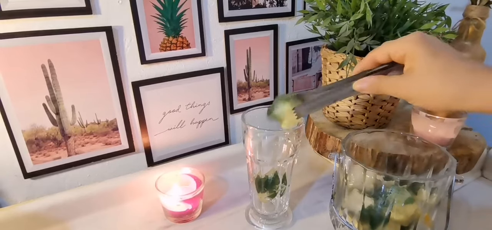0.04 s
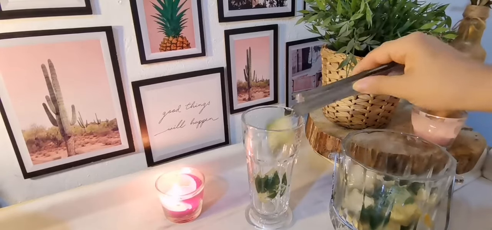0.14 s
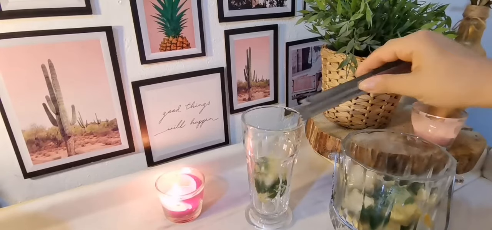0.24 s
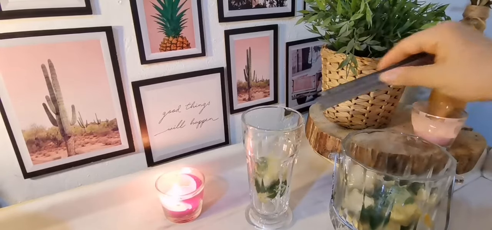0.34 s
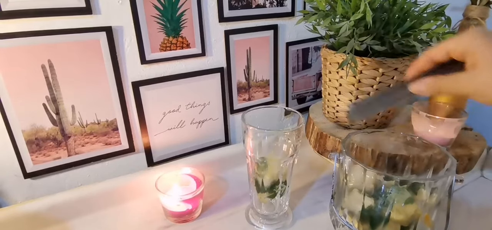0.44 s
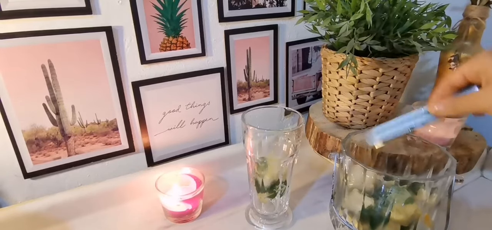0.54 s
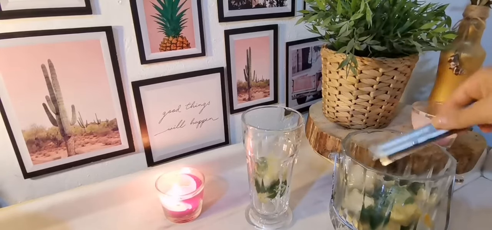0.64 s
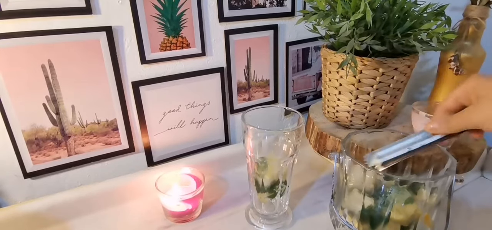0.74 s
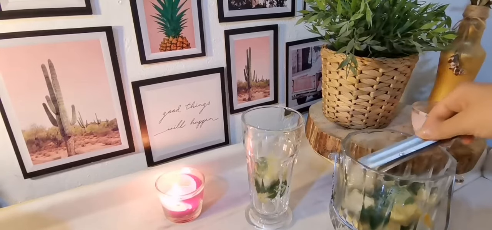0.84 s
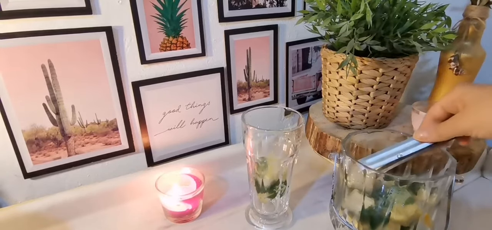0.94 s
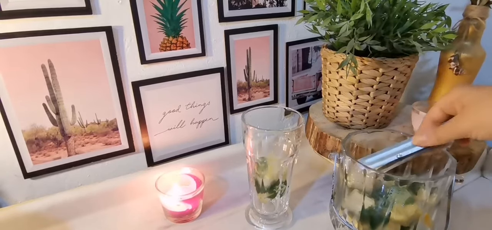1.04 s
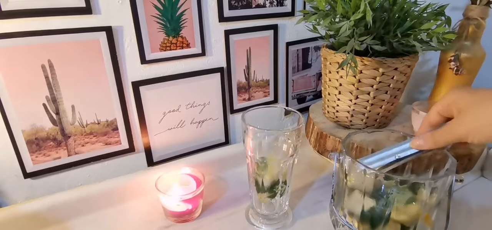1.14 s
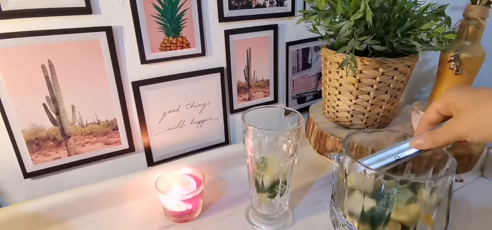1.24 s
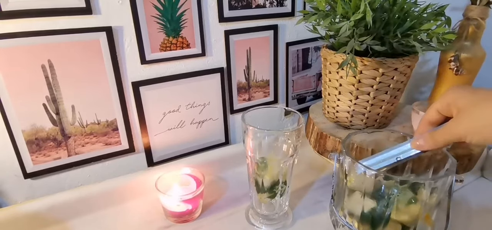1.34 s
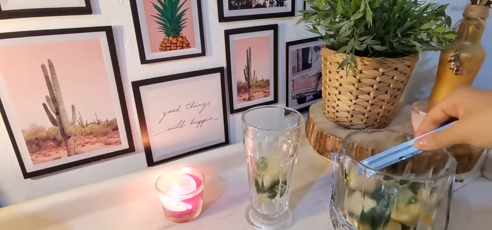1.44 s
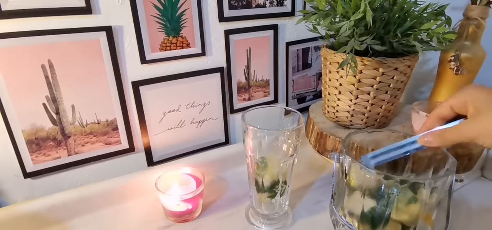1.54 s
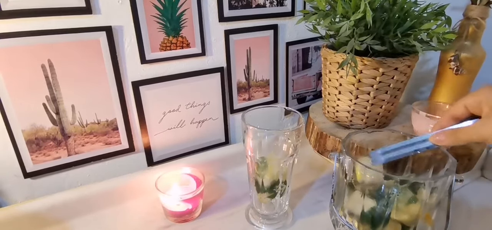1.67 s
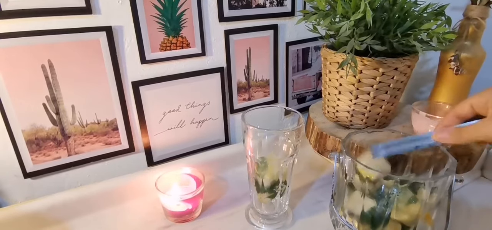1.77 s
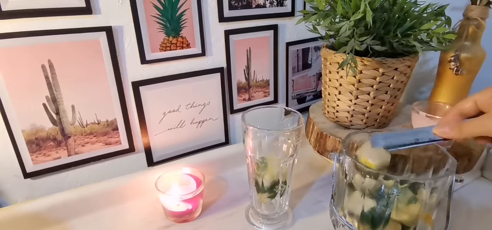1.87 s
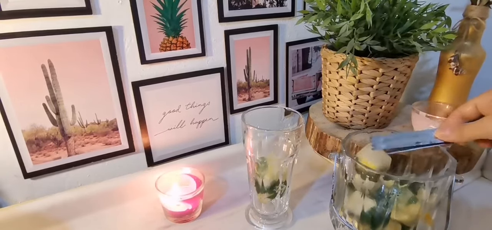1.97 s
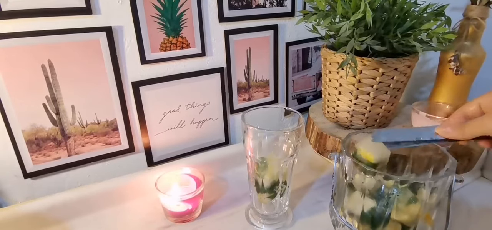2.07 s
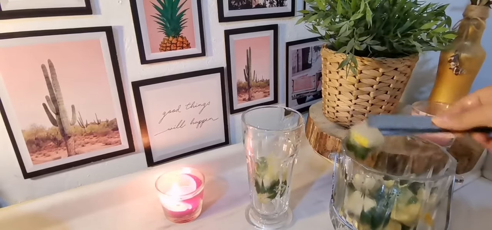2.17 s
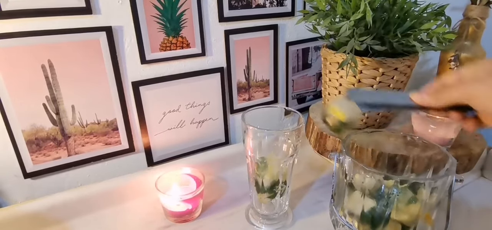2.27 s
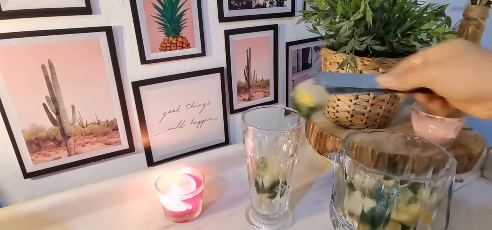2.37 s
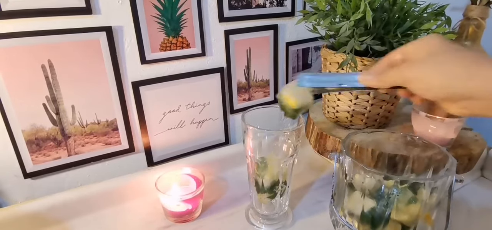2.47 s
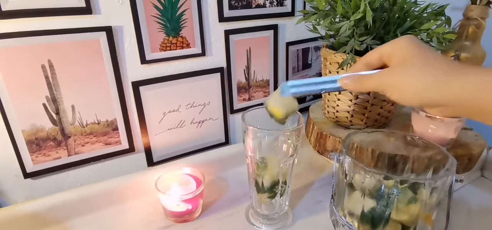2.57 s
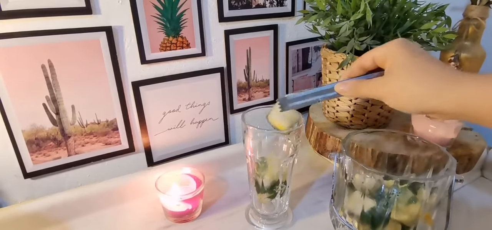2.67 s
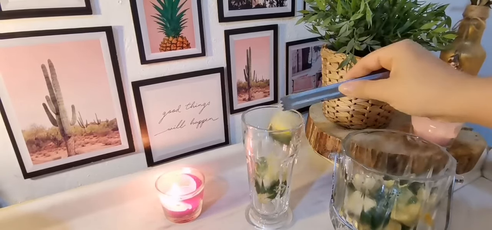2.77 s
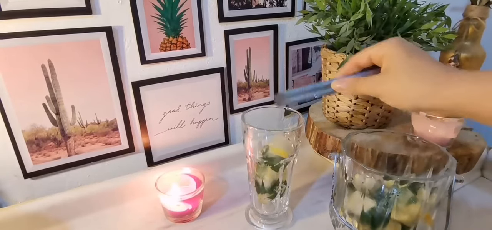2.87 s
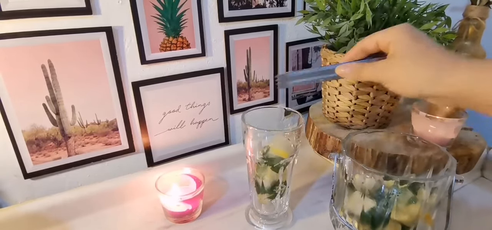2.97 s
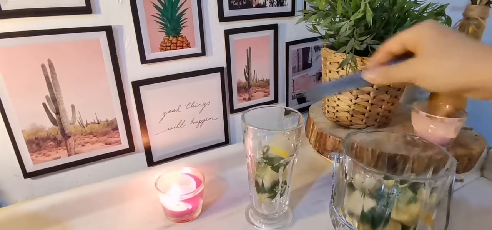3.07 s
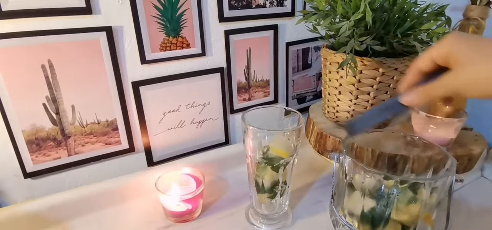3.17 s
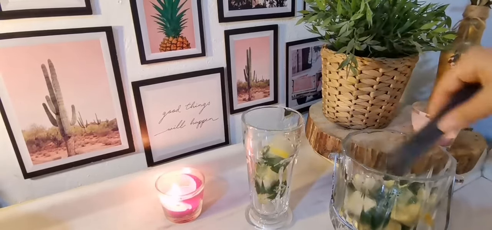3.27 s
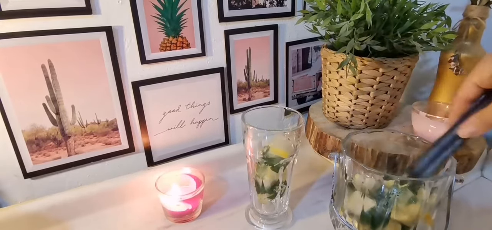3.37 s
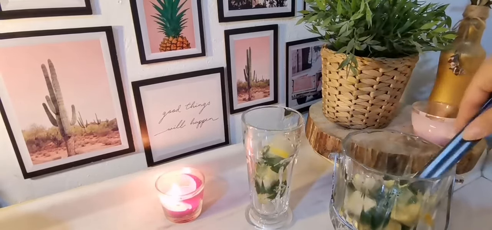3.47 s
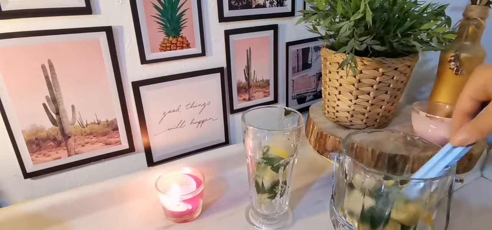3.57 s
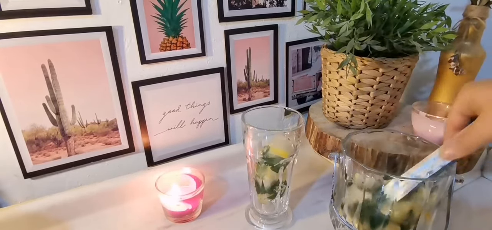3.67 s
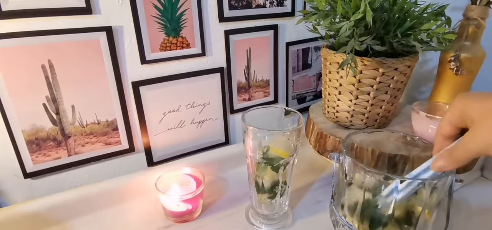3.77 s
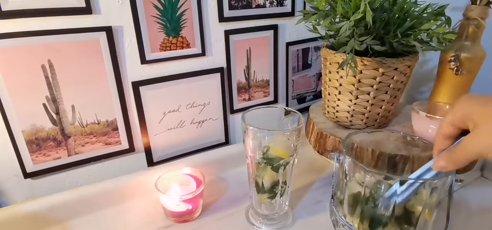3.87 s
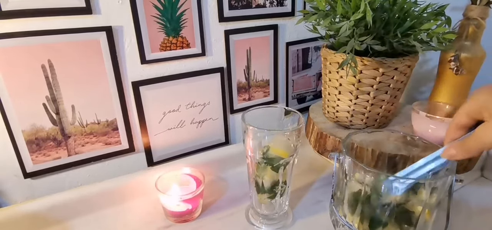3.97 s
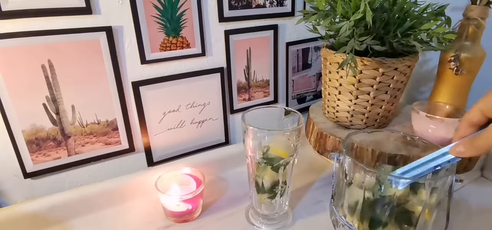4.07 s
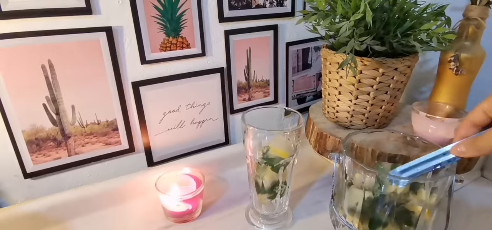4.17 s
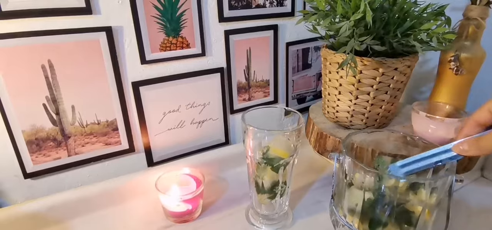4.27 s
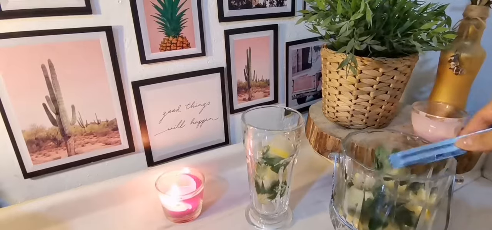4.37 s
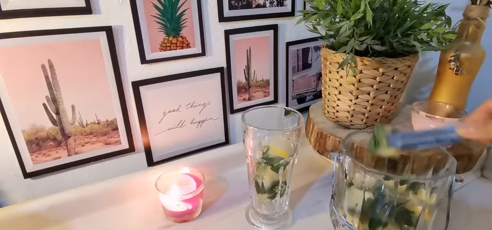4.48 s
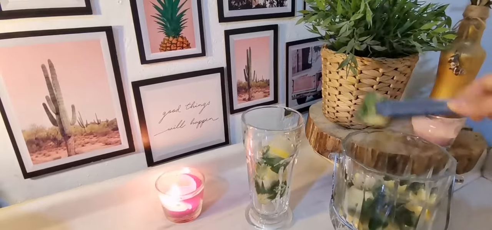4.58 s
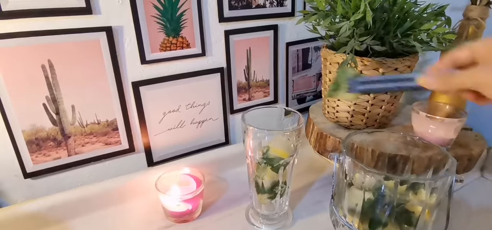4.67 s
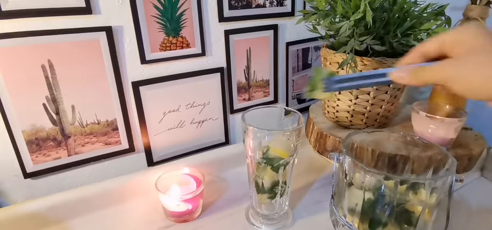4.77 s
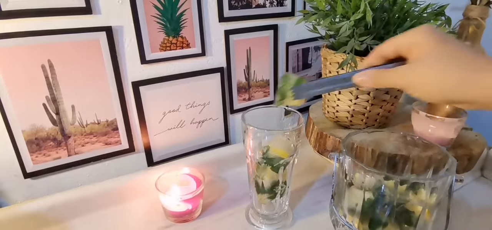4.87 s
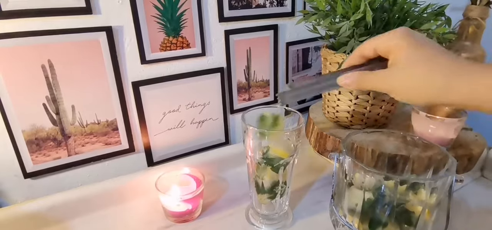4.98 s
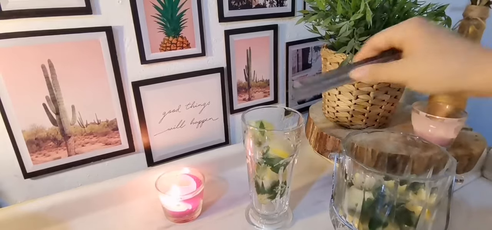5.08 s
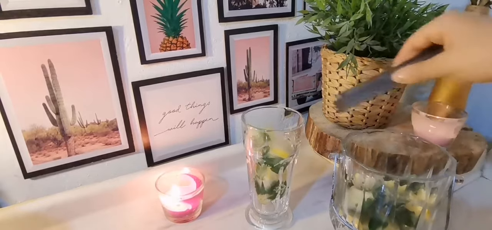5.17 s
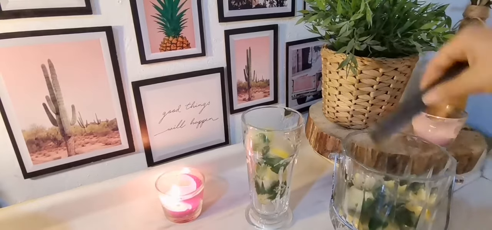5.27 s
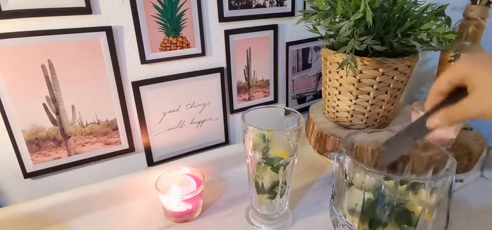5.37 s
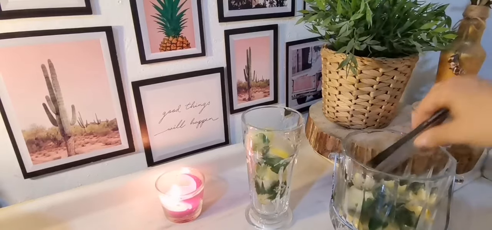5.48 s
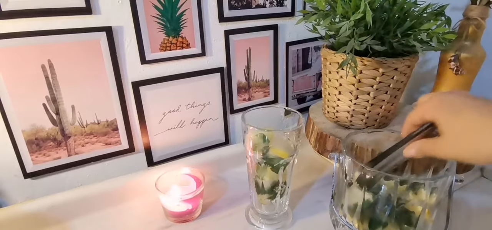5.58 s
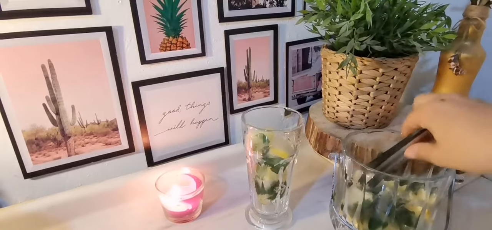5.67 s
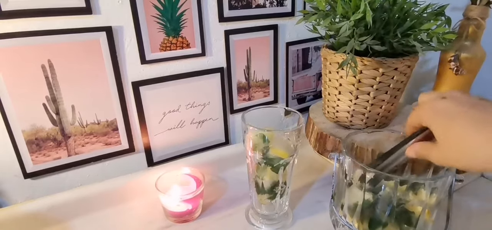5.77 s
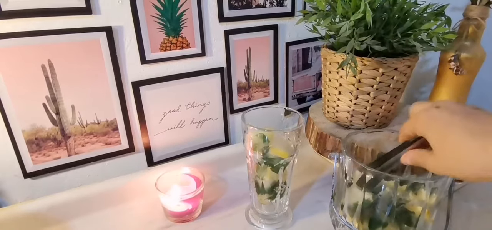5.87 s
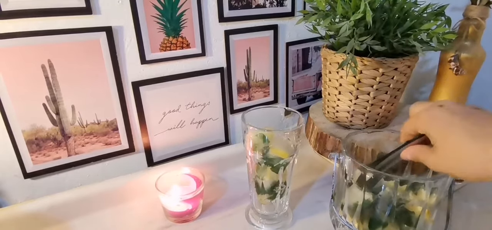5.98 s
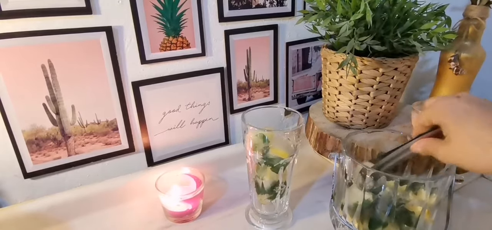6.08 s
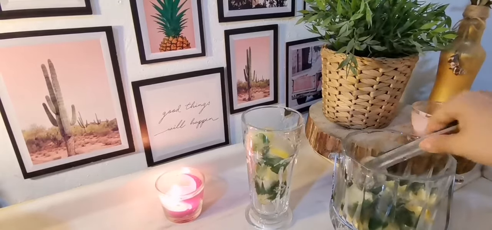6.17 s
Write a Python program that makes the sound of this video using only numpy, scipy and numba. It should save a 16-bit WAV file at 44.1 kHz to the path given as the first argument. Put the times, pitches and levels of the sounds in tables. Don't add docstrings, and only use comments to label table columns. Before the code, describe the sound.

Close stereo pickup in a small hard kitchen with a faint refrigerator hum. A quick cluster of fruit knocks hits a tall glass, followed by quiet wet rummaging. Another single glass knock comes near three seconds, then firmer digging with pitcher clinks and leafy rustle. A tight flurry of glass knocks lands at five seconds, and the tongs go back into the pitcher, tapping and scraping to the end.

```python
import sys
import numpy as np
from numba import njit
from scipy import signal
from scipy.fft import rfft, irfft, next_fast_len
from scipy.io import wavfile

SR = 44100
rng = np.random.default_rng(int(sys.argv[2]) if len(sys.argv) > 2 else 0)


def persist_wave(psi):
    counts = np.round(np.clip(psi, -1, 1) * 32767).astype(np.int16)
    wavfile.write(sys.argv[1], SR, np.atleast_2d(counts).T)


def volts_from_db(level):
    exponent = np.asarray(level, float) / 20
    return 10 ** exponent


N = 274743

# (frequency [Hz], level [dB per Hz])
AIR_SPECTRUM = [(47, -36.5), (80, -3), (155, -8), (194, -10.5), (270, -17.5), (336, -8), (367, -20),
                (410, -15), (559, -20), (697, -18.5), (1540, -26), (3420, -26.5), (6630, -33),
                (10100, -55.5), (15700, -39.5)]
# (frequency [Hz], likeness [0..1])
AIR_LIKENESS = [(60, 0.51), (180, 0.76), (550, 0.33), (1650, 0.034), (4970, 0.013), (15000, 0.01)]
# (time [s], level [dB])
HUM = [(0.0, -47), (0.07, -45.5), (0.15, -52.5), (1.65, -47.5), (1.8, -42.5), (1.92, -50.5), (2.12, -47),
       (3.04, -54), (3.5, -44.5), (3.56, -58), (4.34, -50), (4.41, -43), (5.19, -57), (5.53, -40.5),
       (5.64, -56), (5.69, -49.5), (6.18, -49.5), (6.23, -54)]
# (frequency [Hz], width [Hz], level [dB])
MOTOR_TONES = [(100.6, 44, -59.5), (192.3, 9.7, -63), (3388, 37, -72.5), (4820, 270, -74.5)]
# (time [s], force [dB], contact fullness [dB], edge clack [dB], brightness [dB])
GLASS_KNOCKS = [(0.1489, -14, -8.5, -14, -16), (0.1699, -38.5, 13, 0, 4.5), (0.2462, -14, -10.5, -9.5, -15),
                (0.2671, -12.5, -11, -20, -20), (0.2848, -8.5, -16, -19.5, -19.5),
                (2.7393, -40, 5.5, -14, -5), (2.866, -27, -48, -54, -11), (2.9116, -5, -17, -8.5, -21.5),
                (5.0172, -6.5, -19.5, -11, -17), (5.0255, -15.5, -10.5, -29, -17),
                (5.0368, -12, -21, -42, -21), (5.0662, -7, -20, -22, -20.5), (5.084, -22, -5, -11, -5.5)]
# (frequency [Hz], level in group [dB], t60 [s])
GLASS_MODES = [(545.5, -6.5, 0.12), (720.5, 5, 0.066), (901, 6.5, 0.037), (1168, 12.5, 0.017),
               (1369, 7, 0.022), (2607, -8, 0.31), (2600, -14.5, 0.37), (2820, -7, 0.12),
               (2983, 0.5, 0.019), (5710, -2.5, 0.11), (5863, 4, 0.11), (5990, 8.5, 0.058),
               (6300, -8, 0.11), (5904, 5.5, 0.11), (8830, 2.5, 0.062), (9540, -3, 0.043), (10430, 2, 0.16),
               (10820, -15, 0.54), (11770, -2, .15), (13550, -7.5, .05), (15630, -2, .06)]
# first ring, thud, clack, second ring, top rings [Hz]
GLASS_GROUPS_HZ = [2610, 720, 1500, 5870, 10500]
# (time [s], thump [dB], boom [dB])
LANDINGS = [
    (0.248, -15.5, -30.5),
    (0.264, -18, -42),
    (0.285, -22.5, -32),
    (2.911, -22.5, -40.5),
    (5.017, -40, -37.5),
    (5.065, -30.5, -42.5),
    (5.291, -48, -66),
]
# (frequency [Hz], level in group [dB], t60 [s])
BASE_MODES = [(119, 6, 0.099), (317, 5, 0.039), (344, -8.5, 0.042), (355.6, -9, 0.093)]
BASE_GROUPS_HZ = [356, 130]
# (time [s], lower rings [dB], upper rings [dB])
TONG_TICKS = [(0.8274, -61, -66), (1.1654, -71, -60), (1.5527, -50.5, -62), (1.8574, -45, -56),
              (1.8746, -42, -47), (2.7898, -42, -52), (2.824, -42, -39), (3.2458, -60, -85),
              (4.976, -50.5, -49), (4.987, -49, -42)]
# (frequency [Hz], level in group [dB], t60 [s])
TONG_MODES = [(6396, 0.5, .025), (9110, 5.5, 0.017), (9800, -17, .05), (10500, -9.5, 0.046),
              (11250, -11, 0.092), (13400, -6, .02), (14900, -11.5, .02)]
TONG_GROUPS_HZ = [9000, 12000]
# (peak [s], rub [dB], squelch over rub [dB], leaf hiss over rub [dB], fade [s])
STROKES = [(0.83, -59.5, 18, -11, 0.043), (0.91, -44.5, -0.5, -5, 0.094), (0.975, -51, 2, -12, 0.055),
           (1.18, -46.5, -0.5, -7, 0.11), (1.352, -55.5, 8, -8, 0.05), (1.52, -58.5, 12, -8, .05),
           (1.568, -44.5, 3.5, 6, 0.042), (3.625, -35, -3.5, 0, 0.075), (3.706, -34.5, 1, -8, 0.093),
           (3.808, -33.5, 4.5, -2, 0.086), (3.842, -29.5, -22, -24, 0.048), (3.9, -52, -2, 3.5, 0.18),
           (4.04, -55.5, 5, -8, 0.089), (4.14, -47, 4, -20, 0.072), (5.66, -38.5, 7.5, -7.5, 0.086),
           (5.72, -37, -3, -11.5, 0.1), (5.776, -39.5, -2, 1.5, 0.066), (5.93, -36, 3, -2, 0.067),
           (6.07, -50.5, -3, -14, 0.067), (6.115, -51.5, 2, -15, 0.056), (6.15, -45.5, 5, -23, 0.07)]
# (peak [s], rub [dB], squelch over rub [dB],
# leaf hiss over rub [dB], fade [s])
SLIPS = [(2.786, -62.5, 21, 10, 0.024), (2.826, -63, 2.6, 17, 0.049), (2.89, -42.5, 6.5, -3, 0.027),
         (5.294, -52, 1.1, -13, 0.059)]
# (time [s], hiss [dB], rub over hiss [dB], fade [s])
FLICKS = [(1.858, -40.5, -20, 0.091), (3.224, -70.5, -19, 0.32), (3.546, -37.5, -11, 0.18),
          (4.104, -53, 4, .1), (4.95, -52, -29, 0.011), (4.986, -44.5, -27, .025), (5.597, -46.5, 0, 0.17)]
# (frequency [Hz], level [dB per Hz])
RUSTLE_SPECTRUM = [(88, -44), (150, -9.5), (382, -6.5), (464, -6.5), (1140, -6), (1430, -4.5), (1740, -17),
                   (2070, -6), (2380, -12), (3440, -12.5), (3870, -14), (9100, -27), (10400, -34.5),
                   (14800, -24), (15700, -24)]
# (time [s], force [dB], contact fullness [dB], hardness [dB], brightness [dB])
PITCHER_KNOCKS = [(0.8929, -36.5, -11, -20, -10), (0.9517, -40, -5, -7, -12),
                  (3.5456, -23, -23.5, 12, 10.5), (3.6613, -31.5, -1, 4.5, 5.5),
                  (3.8009, -27, -7.5, 0.5, -9), (3.8219, -38, 7, -2, -11), (3.8474, -34, -10, 7, -16),
                  (3.8845, -30.5, -4.5, 13.5, 9.5), (4.1059, -57.5, 18, 28, 26.5),
                  (4.1545, -24, -9, 11.5, -8), (4.352, -25.5, -11.5, 8, -7), (5.2642, -63, -1, -2, 20),
                  (5.2925, -70, 31.5, -2, -6), (5.5951, -25.5, -18, -55, -30), (5.6512, -26, -8, -16, -16),
                  (5.7501, -33, -4, -24, -17), (5.7669, -27, -1.5, -6.5, -4), (5.901, -32, -7, -15, -8.5),
                  (5.9224, -28.5, -16, -21, -22), (6.0492, -39.5, -6, -25, -21.5),
                  (6.0701, -33.5, -4, -44, -24), (6.1562, -35, 2.5, -29, -16)]
# (frequency [Hz], level in group [dB], t60 [s])
PITCHER_MODES = [(321.4, -2.5, 0.11), (381.6, -1, 0.1), (683, -1, 0.039), (1400, -1, 0.05),
                 (1427.5, -4.5, 0.077), (1492, -1.5, 0.095), (2096, 1, 0.037), (3270, -4.5, 0.024),
                 (3441, -4, 0.047), (3497, -4, 0.059), (3603, -4, 0.025), (3680, -9.5, 0.027),
                 (5798, 3, 0.045), (5870, -4.5, 0.051), (6210, -12, 0.042), (6920, 5.5, 0.034),
                 (7730, -4, 0.074), (8540, -2.5, 0.04), (9320, 0.5, 0.031)]
# first ring, thud, second ring, third ring, top rings [Hz]
PITCHER_GROUPS_HZ = [1480, 500, 3480, 5850, 7500]
# (frequency [Hz], level re range level [dB])
CRACK_SPECTRUM = [(150, -19), (300, -16), (1300, -7.5), (2700, -12), (4300, -14.5), (6000, -2.5),
                  (8000, -47), (11000, -28.5), (15000, -1.5)]
# (frequency [Hz], t60 [s])
ROOM_T60 = [(250, 0.34), (1000, 0.32), (2600, 0.33), (6000, 0.32), (12000, 0.15)]
# (frequency [Hz], difference [dB])
LEFT_FAVOUR = [(500, 0), (3000, -0.5), (10000, 8)]
# (frequency [Hz], gain [dB])
MICROPHONE = [(8000, -2.5), (9500, -2.5), (10200, -7.5), (12400, -0.5), (13000, 2), (15700, 0)]

BAND_EDGES_HZ = 22 * 2 ** np.arange(0, 9.7, .4)
OPPOSED = np.array([[1], [-1]])
HALVES = np.array([[.5], [-.5]])


def rms_one(x):
    return x / np.sqrt(np.mean(x ** 2) + 1e-20)


def at_hz(points, hz):
    points_hz, values = np.array(points).T
    return np.interp(np.log(hz), np.log(points_hz), values)


def shaped(x, gain):
    size = next_fast_len(N)
    hz = np.arange(1, size // 2 + 2) * SR / size
    return irfft(rfft(x, size) * gain(hz), size)[..., :N]


def drift(rate_hz):
    r = np.exp(-80 * np.pi * rate_hz / SR)
    white = rng.standard_normal(N // 40 + 2002)
    slow = signal.lfilter([1], [1, -2 * r, r * r], white)[2000:]
    return np.interp(np.arange(N) / 40, np.arange(len(slow)), rms_one(slow))


def bands(x, lowest_hz):
    for k, (low, high) in enumerate(zip(BAND_EDGES_HZ, BAND_EDGES_HZ[1:])):
        if low > lowest_hz:
            sos = signal.butter(2, [low, high], "band", fs=SR, output="sos")
            yield np.sqrt(low * high), signal.sosfilt(sos, x[k % 2])


def air():
    out, together = 0, drift(0.84)
    for hz, (mid, side) in bands(rng.standard_normal((2, 2, N)), lowest_hz=20):
        alike = np.clip(at_hz(AIR_LIKENESS, hz), 0, 1)
        gain = volts_from_db(at_hz(AIR_SPECTRUM, hz) + 0.21 * together + 1.93 * drift(8.4))
        out = out + gain * (np.sqrt(1 + alike) * mid + np.sqrt(1 - alike) * side * OPPOSED)
    return volts_from_db(-52) * rms_one(out)


def fridge():
    time_s, level_db = np.transpose(HUM)
    hum_db = np.interp(np.arange(N) / SR, time_s, level_db) + 3 * drift(8)
    hum_hz = 48 + .9 * drift(3)
    out = np.sqrt(2) * volts_from_db(hum_db) * np.sin(2 * np.pi * np.cumsum(hum_hz) / SR)
    for hz, width_hz, level_db in MOTOR_TONES:
        r = np.exp(-np.pi * width_hz / SR)
        a = [1, -2 * r * np.cos(2 * np.pi * hz / SR), r * r]
        once = signal.lfilter([1, 0, -1], a, rng.standard_normal(N + SR))
        tone = signal.lfilter([1], a, once)[SR:]
        out = out + volts_from_db(level_db) * rms_one(tone)
    return out * volts_from_db(HALVES)


@njit(fastmath=True)
def swing_of(force, kept, pole, onset, left, right):
    out, swing, built = np.zeros((2, len(force))), 0j, 0j
    for i in range(len(force)):
        swing = swing * pole * kept[i] + force[i] + 1e-18
        built = built * pole * onset + swing * (1 - onset)
        out[0, i], out[1, i] = (built * left).imag, (built * right).imag
    return out


def ring(force, kept, hz, level_db, t60_s, push_s):
    pole = np.exp((2j * np.pi * hz - np.log(1000) / t60_s) / SR)
    lobe_db, lobe_phase = rng.normal(0, 1, 2)
    side = np.array([.5, -.5])
    phase = side * 1.98 * lobe_phase * min(hz / 1500, 1)
    left, right = volts_from_db(level_db + side * 2.1 * lobe_db) * np.exp(1j * phase)
    return swing_of(force, kept, pole, np.exp(-1 / (push_s * SR)), left, right)


def struck(knocks, modes, groups_hz, rattle, slide, noise_bands, ring_db, crack_db, crack_s, top_db):
    rows, order = np.array(knocks), np.argsort(groups_hz)
    log_groups = np.log(groups_hz)[order]
    at = np.round(rows[:, 0] * SR).astype(int)
    uneven_db = .8 * rng.standard_normal((len(rows), len(modes)))
    kept = np.ones(N)
    kept[at] = volts_from_db(-7)

    def blows_at(hz):
        return volts_from_db([np.interp(np.log(hz), log_groups, row[1:][order]) for row in rows])

    out = 0
    for k, (hz, level_db, t60_s) in enumerate(modes):
        force = rattle * volts_from_db(-14 * abs(np.log2(hz / 1450))) + slide * min(hz / 5000, 1) ** 2
        force[at] += blows_at(hz) * volts_from_db(uneven_db[:, k] + ring_db)
        out = out + ring(force, kept, hz, level_db, t60_s, push_s=0.0014)
    for hz, band in noise_bands:
        r = np.exp(-1 / (crack_s * max(1200 / hz, 1) * SR))
        spike = np.zeros(N)
        spike[at] = blows_at(hz) * (1 - r) * np.e
        swell = signal.lfilter([1], [1, -2 * r, r * r], spike + 1e-18)
        out = out + volts_from_db(at_hz(CRACK_SPECTRUM, hz) + crack_db + top_db * (hz > 10000)) * swell * band
    return out


def drinking_glass(noise, still):
    time_s, force, full, edge, bright = np.transpose(GLASS_KNOCKS)
    top = force - 12.5 + 1.6 * bright
    knocks = np.transpose([time_s, force, force + full, force + edge, force + bright, top])
    return struck(knocks, GLASS_MODES, GLASS_GROUPS_HZ, still, still, noise[3:],
                  ring_db=2.0, crack_db=5.0, crack_s=0.00097, top_db=6.0)


def landing_fruit(still):
    return struck(LANDINGS, BASE_MODES, BASE_GROUPS_HZ, still, still, [],
                  ring_db=-1.0, crack_db=0, crack_s=1, top_db=0)


def tongs(noise, still, slide):
    return struck(TONG_TICKS, TONG_MODES, TONG_GROUPS_HZ, still, slide, noise[9:],
                  ring_db=9.5, crack_db=-7.0, crack_s=0.0047, top_db=4.5)


def gesture(peak_s, swell_s, fade_s):
    t = np.arange(N) / SR - peak_s
    return volts_from_db(-20 * np.where(t < 0, (t / max(swell_s, .001)) ** 2, t / max(fade_s, .001)))


def digging_levels():
    power = np.full((4, N), 1e-12)
    for rows, rattle_db in [(STROKES, 4), (SLIPS, -15)]:
        for peak_s, rub_db, squelch_db, hiss_db, fade_s in rows:
            over_rub_db = np.array([[squelch_db], [0], [hiss_db], [rattle_db]])
            power += (volts_from_db(rub_db + over_rub_db) * gesture(peak_s, 0.57 * fade_s, fade_s)) ** 2
    for time_s, hiss_db, rub_db, fade_s in FLICKS:
        over_hiss_db = np.array([[rub_db], [0]])
        power[1:3] += (volts_from_db(hiss_db + over_hiss_db) * gesture(time_s, .004, fade_s)) ** 2
    return 10 * np.log10(power)


def grains(per_s, spread_db, count):
    born = rng.random((count, N)) < per_s * volts_from_db(6 * drift(30)) / SR
    sizes = volts_from_db(spread_db * np.minimum(rng.exponential(1, (count, N)), 4))
    snaps = born * sizes * rng.choice([-1, 1], (count, N))
    return rms_one(rms_one(snaps) + .5 * rng.standard_normal((count, N)))


def rustle(levels_db):
    ranges = [(100, 1200, -2.5, .4), (1200, 4500, -1.5, .8), (4500, 30000, -1.5, .9)]
    out = 0
    for level_db, (low_hz, high_hz, trim_db, wide) in zip(levels_db, ranges):
        def colour(hz):
            return volts_from_db(at_hz(RUSTLE_SPECTRUM, hz)) / (1 + (low_hz / hz) ** 6) / (1 + (hz / high_hz) ** 6)
        mid, side = shaped(grains(700, 3.0, count=2), colour)
        out = out + volts_from_db(level_db + trim_db) * rms_one(mid + wide * side * OPPOSED)
    return out


def pitcher(noise, rattle, slide):
    time_s, force, full, hard, bright = np.transpose(PITCHER_KNOCKS)
    top = force - 14.5 + (hard + bright) / 2
    knocks = np.transpose([time_s, force, force + full, force + hard, force + bright, top])
    return struck(knocks, PITCHER_MODES, PITCHER_GROUPS_HZ, rattle, slide * volts_from_db(-14), noise,
                  ring_db=1.0, crack_db=-5.5, crack_s=0.0027, top_db=-12)


def kitchen(x):
    t, echoes = np.arange(SR * 6 // 10) / SR, 0
    for hz, (mid, side) in bands(rng.standard_normal((2, 2, len(t))), lowest_hz=100):
        decay = volts_from_db(-60 * t / at_hz(ROOM_T60, hz))
        echoes = echoes + (mid + min(hz / 700, 1) * side * OPPOSED) * decay
    echoes = echoes * np.clip(t / 0.0023, 0, 1) / np.sqrt(np.sum(echoes ** 2) / 2)
    return signal.fftconvolve(x.mean(axis=0)[None], echoes, axes=1)[:, :N]


def scene():
    levels_db, still = digging_levels(), np.zeros(N)
    rattle = volts_from_db(levels_db[3] - 36) * grains(600, 4.0, count=1)[0]
    slide = volts_from_db(levels_db[2] - 24.5) * grains(304, 7.6, count=1)[0]
    white = rng.standard_normal((2, N))
    noise = [(hz, rms_one(band)) for hz, band in bands(white, lowest_hz=120)]
    counter = drinking_glass(noise, still) + landing_fruit(still) + tongs(noise, still, slide)
    counter = counter + rustle(levels_db) + pitcher(noise, rattle, slide)
    near = counter + volts_from_db(-2.5) * kitchen(counter)
    near = shaped(near, lambda hz: volts_from_db(at_hz(LEFT_FAVOUR, hz) * HALVES))
    return near + air() + fridge()


def top_cut(x):
    return signal.sosfilt(signal.butter(12, 16960, fs=SR, output="sos"), x)


def record(dry):
    heard = shaped(dry, lambda hz: volts_from_db(at_hz(MICROPHONE, hz)))
    heard = .95 * np.tanh(heard / .95)
    low_pass = signal.ellip(10, .5, 70, 15850, fs=SR, output="sos")
    mix = signal.sosfilt(low_pass, heard)
    return top_cut(mix)


dry = scene()
out = record(dry)
persist_wave(out)
```